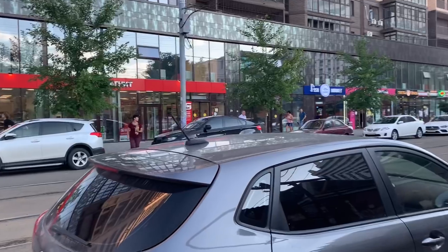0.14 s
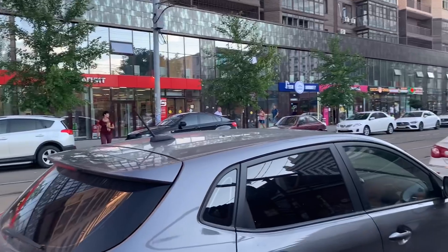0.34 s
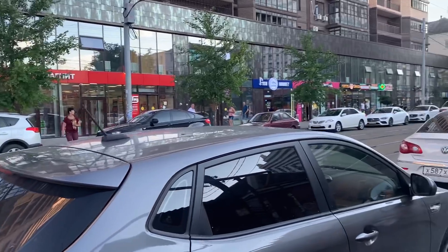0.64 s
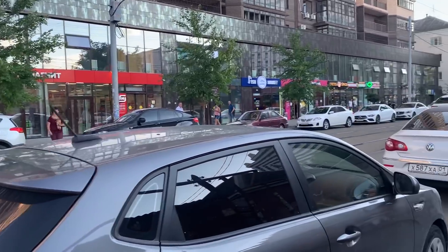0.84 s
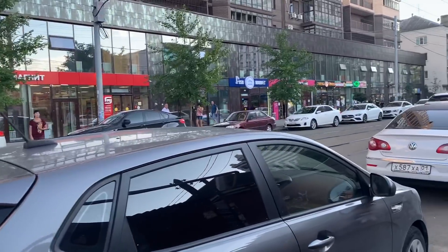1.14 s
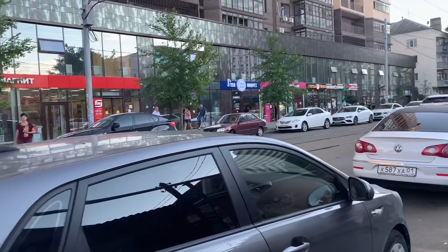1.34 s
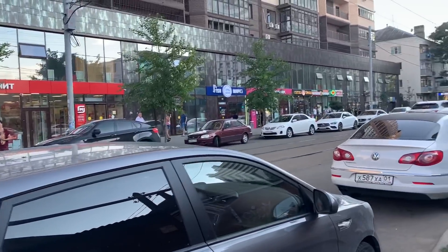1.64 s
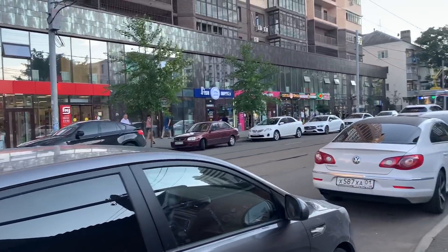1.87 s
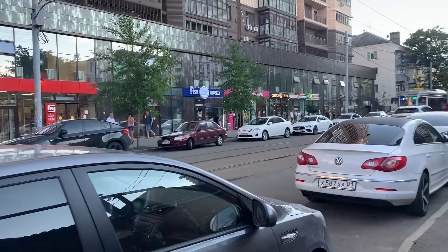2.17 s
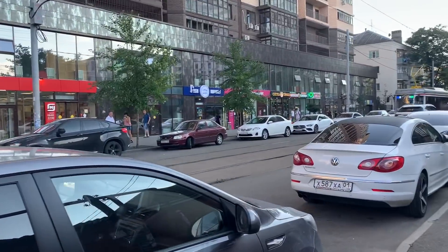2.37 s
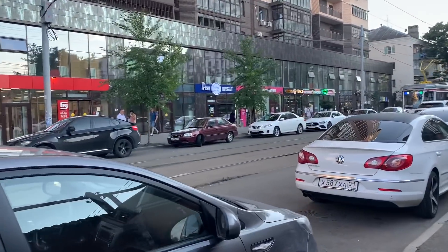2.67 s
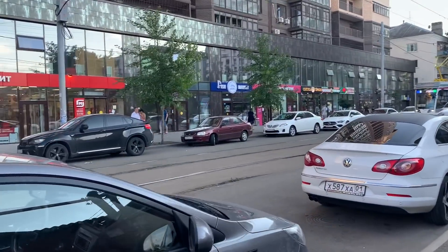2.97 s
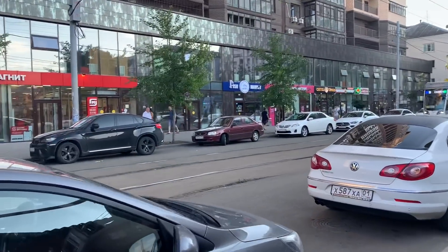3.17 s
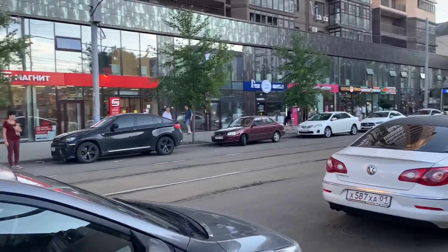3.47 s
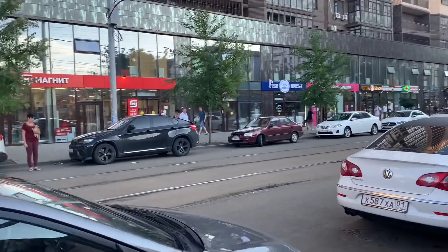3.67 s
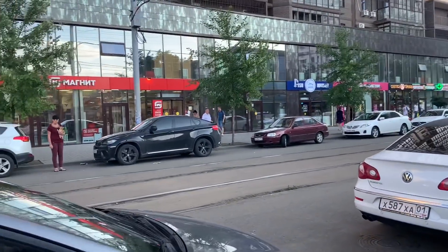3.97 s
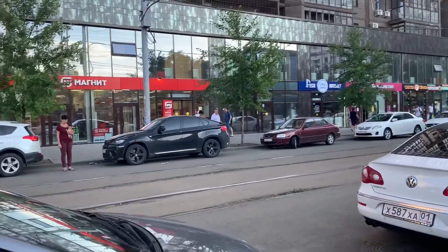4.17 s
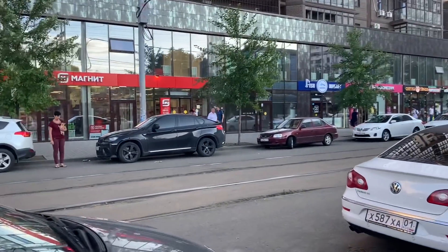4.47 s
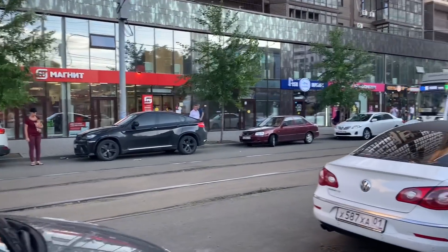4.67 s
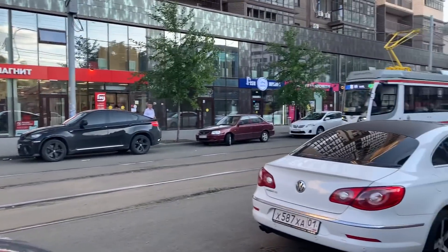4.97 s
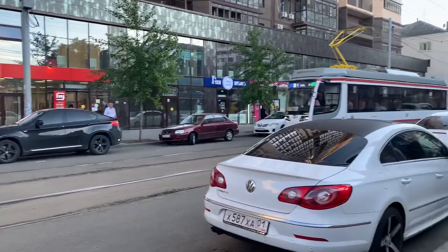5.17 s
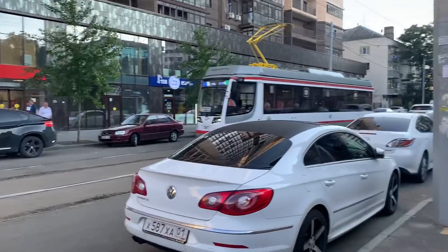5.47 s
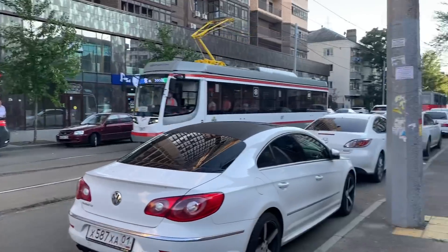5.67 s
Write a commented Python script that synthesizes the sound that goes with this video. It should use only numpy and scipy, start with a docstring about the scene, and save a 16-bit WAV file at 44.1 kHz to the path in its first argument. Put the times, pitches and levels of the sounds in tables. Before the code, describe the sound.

Wind buffets and thumps a handheld phone while an approaching tram's wavering mid-pitched whine and rough steel rolling grow louder along a street.

```python
"""A buffet of wind rumbles first, over the whine and rolling of a tram nearing along a shop-lined street.
It is heard on a handheld phone behind parked cars. The whine stacks smeared multiples of a tooth rate;
rolling, wind and air hiss are coloured noise, with narrow rings and a broad rush added to the rolling.
Wind slaps on the microphone ports are short swinging wavelets; squeaks and ticks are bursts in the treble."""
import sys
import numpy as np
from scipy import signal
from scipy.fft import rfft, irfft, next_fast_len
from scipy.io import wavfile
from scipy.ndimage import uniform_filter1d

SR = 44100
rng = np.random.default_rng(int(sys.argv[2]) if len(sys.argv) > 2 else 0)


def unload_audio(sound):
    """Save the sound as a 16-bit wav file, at the path given as the first command line argument."""
    columns = np.transpose(np.atleast_2d(sound))
    # keep every value between -1 and 1, then stretch to whole-number steps
    steps = np.round(np.clip(columns, -1, 1) * 32767)
    wavfile.write(sys.argv[1], SR, steps.astype(np.int16))


N = 256698
EDGE = 1024  # spare samples at the ends
LONG = N + EDGE  # the street sounds on a little past the end
T = np.arange(LONG) / SR  # time in seconds
SPAN = next_fast_len(LONG + 2 * EDGE)
F = np.arange(SPAN // 2 + 1) * SR / SPAN  # frequency in Hz


def undb(db):
    """Turn decibels into an amplitude factor."""
    return 10 ** (np.asarray(db) / 20)


def curves(table):
    """Join the rows of a table, times first, into one curve of straight lines per further column."""
    s, *columns = np.transpose(table)
    return [np.interp(T, s, c) for c in columns]


def unit(x):
    """Scale a sound to an average (rms) level of 1."""
    return x / np.sqrt(np.mean(np.abs(x) ** 2))


def walk(rate):
    """Random levels held 1 / rate seconds, then smoothed twice; their rms is 1."""
    hold = int(SR / rate)
    steps = np.repeat(rng.standard_normal(LONG // hold + 1), hold)
    smooth = uniform_filter1d(uniform_filter1d(steps, hold), hold)
    return unit(smooth[:LONG])


def shaped(gain):
    """Two unrelated noises with this gain over frequency."""
    return irfft(rfft(rng.standard_normal((2, SPAN))) * gain, SPAN)[:, :LONG]


def coloured(points, flicker_db, rate, split=1):
    """Noise of a given colour whose bands, split to an octave, flicker each on their own."""
    hz, db = np.transpose(points)
    gain = undb(np.interp(np.log(F + 1), np.log(hz), db, -200, -200))
    place = split * np.log2(F + 1)
    total = 0
    for band in range(int(split * np.log2(hz[0])), int(split * np.log2(hz[-1])) + 2):
        crossfade = np.sqrt(np.clip(1 - abs(place - band), 0, 1))
        total = total + undb(flicker_db * walk(rate)) * shaped(gain * crossfade)
    return unit(total)


# Steady part of the wind and street bass.
# Each row: time in seconds, level of the deep rumble in dB, level of the flutter in dB.
STEADY_WIND = [(0, -30, -36), (.6, -39, -39), (.95, -27, -32), (1.3, -36, -42), (1.95, -35.5, -39),
               (2.4, -33, -42), (3.2, -37, -34), (3.8, -35.5, -32), (4.25, -31, -33), (4.7, -35.5, -35),
               (5.2, -34, -34), (5.82, -34.5, -38.5)]
# Buffets of wind. Each row: time of the peak in seconds, deep peak in dB, length in seconds.
WIND_BUFFETS = [(0, -20, 0.073), (0.198, -27, 0.035), (0.344, -27, 0.044), (0.712, -28, 0.11),
                (0.955, -25, 0.057), (1.05, -23.5, 0.06), (1.41, -29.5, 0.085), (2.321, -28.5, 0.046),
                (2.489, -28, 0.06), (3.132, -32, 0.16), (3.476, -31.5, 0.084), (3.614, -29, 0.042),
                (3.767, -21.5, 0.08), (3.97, -30.5, 0.052), (4.085, -30, 0.077), (4.33, -29, 0.12),
                (4.5, -30, .07), (4.856, -29.5, 0.14), (5.038, -39, 0.046), (5.191, -22, 0.073),
                (5.376, -29, 0.053), (5.573, -26.5, 0.059), (5.788, -24.5, 0.066)]
# Colour of the deep rumble. Each row: frequency in Hz, strength in dB per Hz.
DEEP_COLOUR = [(22, -20), (35, -13), (55, 3), (75, 2.5), (110, -2.5), (160, -16)]
# Colour of the flutter. Each row: frequency in Hz, strength in dB per Hz.
FLUTTER_COLOUR = [(80, -11), (130, -3.5), (220, -2.5), (330, -11), (480, -11.5), (650, -46.5)]
BUFFET_FLUTTER_DB = -8  # flutter that a buffet brings, compared with its deep peak


def gusts():
    """Deep rumble and faster flutter; each buffet swells both, its power adding to the steady part."""
    deep_db, flutter_db = curves(STEADY_WIND)
    swell = sum(undb(2 * db) * np.exp(-(2 * (T - s) / length) ** 2) for s, db, length in WIND_BUFFETS)
    deep = np.sqrt(undb(2 * deep_db) + swell)  # doubled dB make powers
    flutter = np.sqrt(undb(2 * flutter_db) + undb(2 * BUFFET_FLUTTER_DB) * swell)
    return deep * coloured(DEEP_COLOUR, 1.0, 22.0) + flutter * coloured(FLUTTER_COLOUR, 2.2, 30.)


# Tooth rate, sagging overall as the tram slows. Each row: time in seconds, rate in Hz.
TOOTH_RATE = [(0, 422), (.1, 428), (.22, 434), (.55, 444), (.8, 441), (1.3, 442), (1.9, 434), (2.6, 437),
              (3.3, 430), (3.6, 434), (3.85, 420), (4.2, 424), (4.6, 415), (4.85, 414), (5.05, 422),
              (5.7, 421), (5.82, 417)]
# Uneven level of the whine: it throbs and flutters, growing louder overall late on.
# Upper multiples follow it only in part. Each row: time in seconds, level in dB.
WHINE_LEVEL = [(0.0, -41), (0.16, -37.5), (0.31, -39.5), (0.34, -31.5), (0.66, -33.5), (0.73, -40.5),
               (0.76, -36.5), (0.88, -40.5), (0.92, -28.5), (0.97, -52), (1.0, -29.5), (1.08, -54),
               (1.26, -40), (1.31, -50), (1.39, -40), (1.57, -42), (1.81, -40), (1.85, -45.5),
               (2.46, -39.5), (2.58, -33), (2.71, -44), (2.92, -33.5), (2.97, -45), (3.11, -34),
               (3.27, -39.5), (3.34, -33), (3.39, -41.5), (3.42, -33), (3.58, -43), (3.86, -36.5),
               (3.89, -46.5), (3.94, -38.5), (4.03, -36.5), (4.08, -50.5), (4.13, -27.5), (4.16, -35.5),
               (4.34, -32.5), (4.38, -42.5), (4.57, -30.5), (4.64, -41), (4.83, -28), (4.88, -42.5),
               (4.97, -31.5), (5.01, -30.5), (5.27, -27.5), (5.32, -45.5), (5.35, -25), (5.4, -38.5),
               (5.43, -27.5), (5.48, -37), (5.51, -25.5), (5.61, -36.5), (5.62, -29), (5.82, -29.5)]
# Multiples of the tooth rate in the whine.
# Each row: multiple, added level in dB, smear in Hz, least steady share from 0 to 1.
TOOTH_MULTIPLES = [(1, 0.5, 34, 0.48), (2, -3.5, 46, 0.29), (3, -11.5, 23, 0.3), (4, -14, 34, 0.4),
                   (5, -15, 73, 0.04), (6, -22, 70, 0.06), (7, -28, 39, 0.4)]
# Line of sight to the gearbox. Each row: time in seconds, extra dB on the upper multiples,
# steadiness from 0 to 1, brightness in dB per multiple (the second multiple takes less of both dB).
GEARBOX_SIGHT = [(0, 3, 0.2, 2.5), (.2, 5, .6, -1), (.4, 0, .75, 1), (.68, 2.5, 0.4, -0.5),
                 (.8, 0, 0.3, -1), (1.1, -1, 0.8, -1), (2.4, -2, 0.1, 2), (2.7, 5, 0.4, 2.5),
                 (3.2, 3.5, 0.1, 1), (3.7, 5.5, 0.03, 1), (4.4, 2.5, 0.14, 0), (5.0, 5, 0, 0.5),
                 (5.66, 1, 0, -1), (5.7, 9, .4, -1), (5.745, 20, 0.7, -1.5), (5.78, 19.5, 0.6, -1.5),
                 (5.82, 12.5, .4, 2)]
REAR_RATIO, REAR_DB = 0.94, -11  # the other bogie's gears, a little lower; dB when nothing is steady
WAVER = 0.004  # quick unevenness of the tooth rate, rms, as a share
PATCHY_DB, PATCHY_PER_S = 2.5, 14.  # each upper multiple comes and goes on its own


def whine():
    """Tooth-rate multiples: a direct line plus echoes off the fronts, which smear it into a band."""
    (hz,), (db,) = curves(TOOTH_RATE), curves(WHINE_LEVEL)
    upper_db, clear, bright_db = curves(GEARBOX_SIGHT)
    phase = 2 * np.pi * np.cumsum(hz * (1 + WAVER * walk(12.))) / SR
    out = np.zeros((2, LONG))
    for k, k_db, smear_hz, steady in TOOTH_MULTIPLES:
        turn = round(k) * phase
        share = np.clip(steady + (1 - steady) * clear ** (2 + k / 2), 0, 1)
        wobble = np.exp(-(F / smear_hz) ** 2)
        # slow complex noise spreads a line to both sides of its pitch
        echoes = np.sqrt(1 - share) * unit(shaped(wobble) + 1j * shaped(wobble))
        rear = unit(shaped(wobble ** 4) + 1j * shaped(wobble ** 4)) * np.exp(1j * (REAR_RATIO - 1) * turn)
        rear *= undb(REAR_DB) * np.sqrt(np.clip(1 - clear, 0, 1))
        direct = np.sqrt(share) * np.array([[np.sqrt(2)], [.2j]])  # mostly in the shared sound
        if k == 1:
            own_db = db
        else:
            sight_db = (upper_db + bright_db * (k - 4)) * (.4 if k == 2 else 1)
            own_db = 0.35 * db + 0.7 * np.mean(db) + sight_db + PATCHY_DB * walk(PATCHY_PER_S)
        swing = echoes + rear + direct
        out += np.sqrt(2) * undb(k_db + own_db) * (swing * np.exp(1j * turn)).real
    return out


# Base level of the rolling and its added bands, before their own boosts.
# Each row: time in seconds, level in dB.
ROLL_LEVEL = [(0, -47), (.68, -44), (1.38, -46), (2.28, -44.5), (2.9, -40), (3.6, -41), (4.8, -39),
              (5.55, -36), (5.82, -34)]
# Colour of the rolling noise. Each row: frequency in Hz, strength in dB per Hz.
ROLLING_COLOUR = [(150, -6.5), (300, -12.5), (600, -9), (900, -6.5), (1300, -9), (2300, -15.5), (3300, -28),
                  (5000, -37), (7000, -46), (9000, -47), (13000, -59.5), (15600, -71.5)]
# Narrow rings, and a broad rush of rolling noise around 2.3 kHz near the end.
# Each row: frequency in Hz, width at half height in Hz, settled level in dB against the base level.
ADDED_BANDS = [(904.5, 36, -3.5), (201, 15, -3), (6120, 430, -25.5), (2280, 640, -15), (2394, 37, -18.5)]
# When each added band starts, in the same order: one time in seconds each, below 0 if already sounding.
BAND_STARTS = -1, 5.17, 1.71, 5.68, 2.75
BAND_FLARE_DB, BAND_FLARE_S = 13, 0.18  # an added band starts with a flare that fades at this pace


def rolling():
    """Rough steel on steel as coloured noise, with narrow rings and a late broad rush added."""
    out = undb(5.5) * coloured(ROLLING_COLOUR, 2.25, 11., split=3)
    for (hz, width_hz, db), start in zip(ADDED_BANDS, BAND_STARTS):
        band = unit(shaped(1 / (1 + (2 * (F - hz) / width_hz) ** 2)))
        flare_db = BAND_FLARE_DB * np.exp(-abs(T - start) / BAND_FLARE_S)
        fade_in = np.clip((T - start) / 0.014, 0, 1)
        out += undb(db + flare_db + 1.2 * walk(20.0)) * fade_in * band
    return undb(curves(ROLL_LEVEL)[0]) * out


# Level of the street air. Each row: time in seconds, level in dB.
AIR_LEVEL = [(0, -53), (.8, -55.5), (2.2, -58), (3, -54), (4, -58), (5.82, -56.5)]
# Colour of the street air. Each row: frequency in Hz, strength in dB per Hz.
AIR_COLOUR = [(2500, 4), (4000, 0), (6000, -3.5), (8000, -14), (9300, -10.5), (10300, -22), (12000, -23.5),
              (14500, -27), (15600, -29)]


def air():
    """Street air: a hiss of treble noise whose octave bands flicker."""
    return undb(curves(AIR_LEVEL)[0]) * coloured(AIR_COLOUR, 2.1, 10.0)


# Wind slaps on the ports. Each row: time in seconds, wavelet peak in dB before the kick is added,
# pitch in Hz, left minus right in dB, tail in seconds (2 ms at least is played).
WIND_SLAPS = [(0.177, -23, 140, 6, 0.0047), (0.191, -19.5, 254, -5, 0.0044), (0.324, -21, 129, 3, 0.0043),
              (0.393, -19, 119, 1, 0.0047), (0.835, -19, 176, -2, 0.02), (0.851, -25, 92, 13, .01),
              (0.892, -24.5, 260, 10, 0.0036), (0.904, -13.5, 166, 7, 0.0034),
              (.914, -17.5, 300, 3, 0.0026), (0.922, -8, 70, 0, 0.021), (.946, -22, 242, 4, 0.0044),
              (1.009, -22, 253, -3, 0.0036), (1.025, -20, 70.5, 3, 0.02), (1.062, -28, 80, 0, .01),
              (1.079, -18, 84, 5, 0.01), (1.076, -26.5, 480, 2, 0.0024), (1.102, -30, 150, 0, 0.0056),
              (1.144, -24, 197, 4, 0.0056), (1.163, -28, 130, 0, 0.0072), (1.666, -29, 150, 2, 0.0054),
              (1.675, -10, 182, 6.5, 0.0037), (2.257, -24.5, 144, 0, 0.0057), (2.318, -26, 103, 11, 0.017),
              (2.348, -24, 80, -2, .01), (2.386, -29, 89.5, 3, .008), (2.461, -22, 141, 4, 0.0094),
              (2.477, -31, 70, 0, 0.0086), (2.496, -25, 85, 7, 0.012), (2.527, -18, 60.4, -5, 0.014),
              (2.852, -22.5, 196, -5, 0.0047), (3.148, -21, 90, 0, 0.004), (3.637, -20, 91, 0, 0.003),
              (3.743, -23.5, 198, -2, 0.009), (3.981, -14.5, 92.5, 1, .008), (4.115, -17.5, 220, 3, 0.0031),
              (4.184, -19, 133, -7, 0.008), (4.199, -20, 242, -1, 0.005), (4.505, -18, 79.4, -2, 0.018),
              (5.203, -30, 91, -4, .006), (5.243, -24, 116, 4, .005)]
SLAP_TURNS = 0.39  # rise of a slap, in cycles of its pitch
KICK_S, KICK_HZ, KICK_SHARE = 0.0017, 357, 0.78  # the share holds for a slap pitched at KICK_HZ


def slaps():
    """A soft pressure wavelet swings out over its tail, with a sharper kick, weaker in deep slaps."""
    out = np.zeros((2, N))
    for s, db, hz, pan_db, tail_s in WIND_SLAPS:
        i = np.arange(int((s - .04) * SR), int((s + 0.093) * SR))
        t = i / SR - s
        rise = np.exp(-(t * hz / SLAP_TURNS) ** 2)
        tail = np.exp(-abs(t) / max(tail_s, .002))
        wavelet = np.where(t < 0, rise, tail) * np.cos(2 * np.pi * hz * t)
        kick = np.exp(-(t / KICK_S) ** 2) * np.cos(2 * np.pi * KICK_HZ * t)
        kick *= KICK_SHARE * np.sqrt(hz / KICK_HZ)
        sides_db = db + np.array([[pan_db], [-pan_db]]) / 2
        out[:, i] += undb(sides_db) * (wavelet + kick)
    return out


# Short squeaks. Each row: time of the peak in seconds, peak of the pure tone in dB, pitch in Hz,
# length in seconds, spread of the rough part in Hz.
SHORT_SQUEAKS = [(0.433, -60.5, 8150, 0.051, 151), (1.717, -53, 6060, 0.022, 450),
                 (3.142, -57.5, 6600, 0.062, 40), (3.754, -65, 12050, .03, 150)]


def squeaks():
    """Brief rough squeaks: a pure tone within a narrow band of noise."""
    out = 0
    for s, db, hz, length, spread_hz in SHORT_SQUEAKS:
        swell = undb(db) * np.exp(-(2 * (T - s) / length) ** 2)
        rough = 0.95 * unit(shaped(np.exp(-((F - hz) / spread_hz) ** 2)))
        out = out + swell * (rough + np.sin(2 * np.pi * hz * T))
    return out


# Treble ticks. Each row: start in seconds, starting rms level in dB.
TREBLE_TICKS = [(1.305, -68), (2.237, -71), (2.5, -69), (2.616, -62), (2.65, -64), (2.899, -67),
                (3.081, -70), (3.277, -71), (3.97, -69), (4.62, -71), (4.9, -58), (5.258, -60), (5.4, -69),
                (5.745, -66), (5.79, -65)]
TICK_T60_S = 0.14  # seconds for a tick to die away by 60 dB


def ticks():
    """Ticks: noise around 13 kHz, with a fainter part near 8 kHz, starts at once and dies away."""
    flare = 0
    for s, db in TREBLE_TICKS:
        flare = flare + undb(db) * (T >= s) * np.exp(-np.log(1000) * abs(T - s) / TICK_T60_S)
    top = 1 / (1 + (2 * (F - 13200) / 2600.0) ** 4)
    lower = .1 * np.exp(-((F - 8000) / 1500) ** 2)
    return flare * unit(shaped(top + lower))


# Likeness of the two channels.
# Each row: frequency in Hz, likeness (limited to 0 to 1), left minus right in dB.
CHANNEL_LIKENESS = [(0, 0.83, -0.3), (300, 0.76, -0.9), (450, 0.97, -1), (770, 0.02, -7.5),
                    (1120, 0.94, -1.5), (1500, 0.43, 0.5), (2070, 0.8, 0), (2750, 0.1, 2), (3800, 0.4, 1),
                    (6840, 0.6, 3), (7160, 0, -1.5), (8500, 0.3, 5), (9230, 1, 0.5), (11800, 0.8, 1.5),
                    (14300, 1, -2), (15000, .5, 3)]
# Phase between the channels: left lags below 7 kHz; 8 to 11 kHz out of phase, top in phase.
# Each row: frequency in Hz, phase turn of the left channel in cycles.
CHANNEL_PHASE = [(0, 0), (300, .02), (450, .16), (1000, .24), (1500, .59), (2200, .89), (3000, 1.21),
                 (3800, 1.69), (6000, 2.83), (7000, 3.06), (8300, 3.5), (11200, 3.5), (11700, 4),
                 (22050, 4)]


def ports(pair):
    """Shared and unshared sound mix into two channels; level and phase differ with frequency."""
    hz, *columns = np.transpose(CHANNEL_LIKENESS)
    like, pan_db = (np.interp(F, hz, c) for c in columns)
    like = np.clip(like, 0, 1)
    padded = np.pad(pair, ((0, 0), (EDGE, EDGE)), "reflect", reflect_type="odd")
    shared, apart = rfft(padded, SPAN) * np.sqrt([(1 + like) / 2, (1 - like) / 2])
    phase_turn = np.exp(-2j * np.pi * np.interp(F, *np.transpose(CHANNEL_PHASE)))
    left = (shared + apart) * undb(pan_db / 2) * phase_turn
    right = (shared - apart) * undb(-pan_db / 2)
    return irfft(np.array([left, right]), SPAN)[:, EDGE:EDGE + N]


def scene():
    """The street reaches both ports; slaps strike the ports themselves."""
    street = gusts() + whine() + rolling() + air() + squeaks() + ticks()
    return ports(street) + slaps()


TOP_HZ = 15700  # the phone passes nothing much above this


def record(dry):
    """The phone rounds the strongest slaps and cuts the top."""
    rounded = np.tanh(1.49 * dry) / 1.487
    return signal.sosfilt(signal.ellip(8, .2, 70, TOP_HZ, fs=SR, output="sos"), rounded)


dry = scene()
out = record(dry)
unload_audio(out)
```